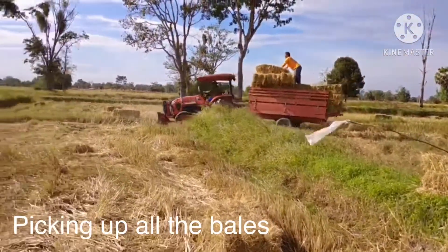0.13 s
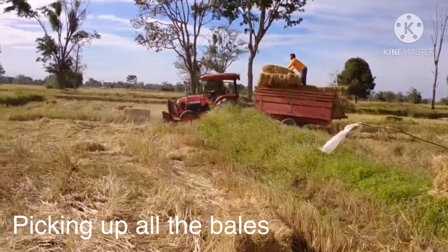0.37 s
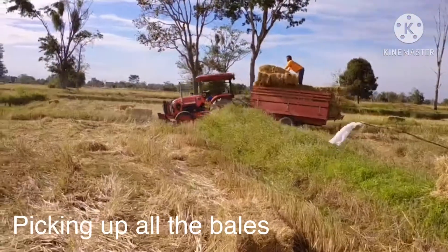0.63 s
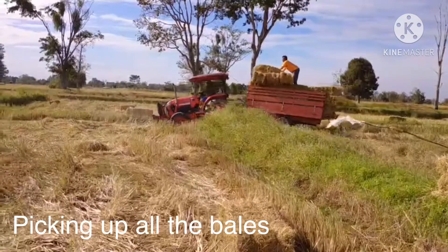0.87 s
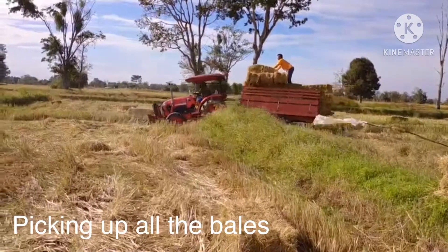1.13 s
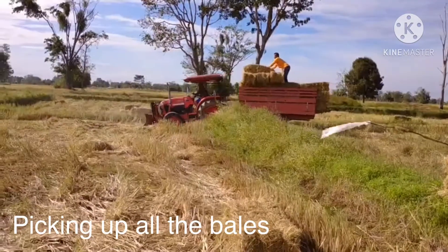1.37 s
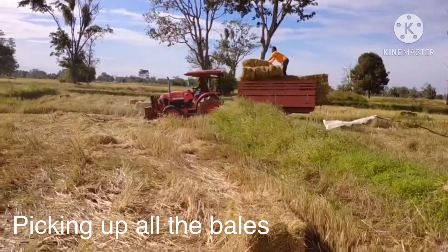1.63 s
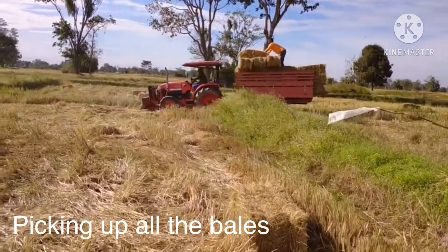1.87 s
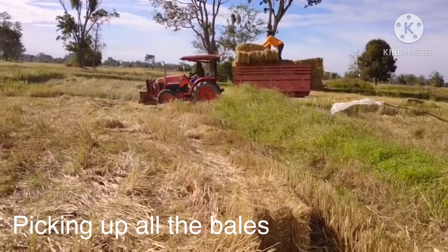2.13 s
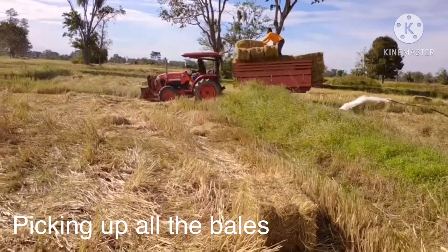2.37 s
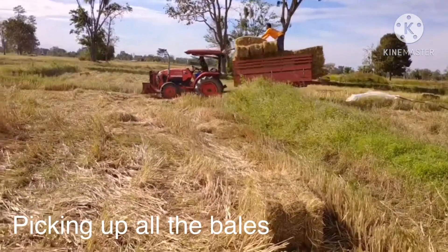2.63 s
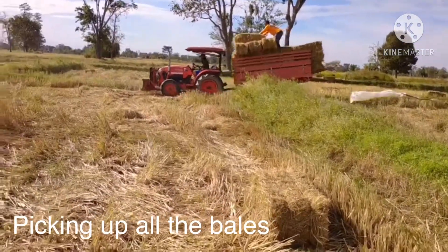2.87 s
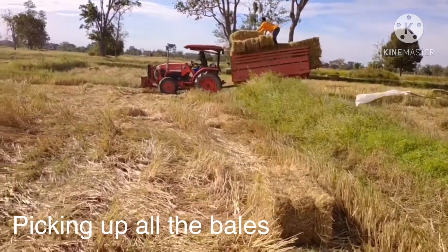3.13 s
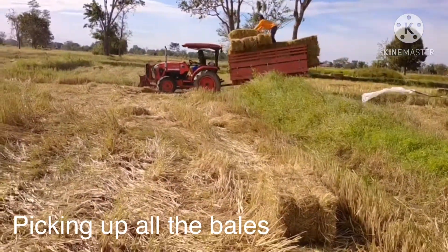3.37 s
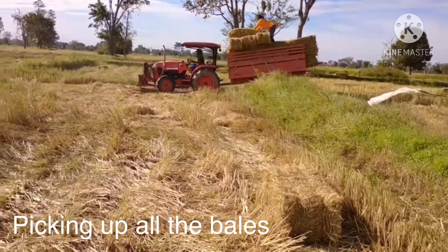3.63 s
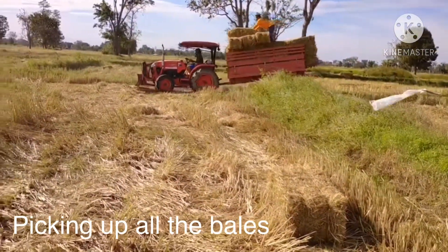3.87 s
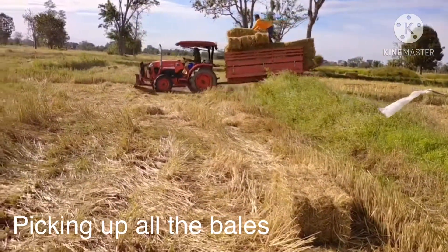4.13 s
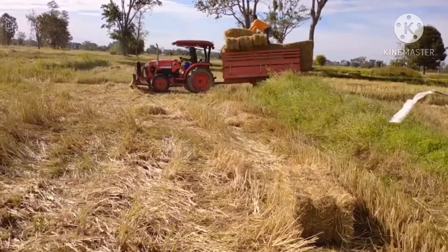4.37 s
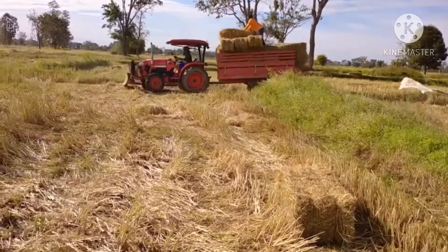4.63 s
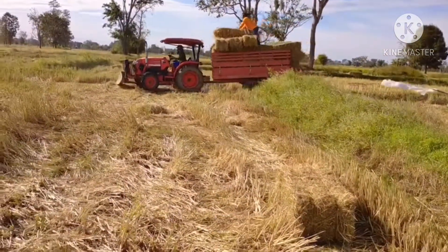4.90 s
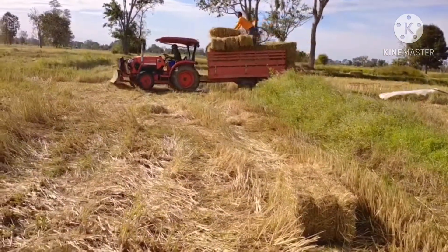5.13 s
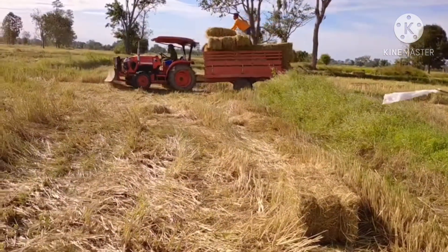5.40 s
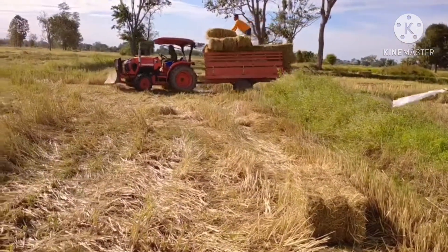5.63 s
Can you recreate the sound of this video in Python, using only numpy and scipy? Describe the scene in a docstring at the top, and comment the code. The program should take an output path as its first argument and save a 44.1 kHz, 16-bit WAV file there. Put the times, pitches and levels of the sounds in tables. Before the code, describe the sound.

A small diesel tractor tows a loaded trailer across an open field, some way from a single microphone, with no echo. The engine runs throughout, about thirty to thirty-five rapid firings a second, wavering in speed and rising slightly toward the end: low exhaust thump, metallic mid-range knock, clatter, fan whirr and fine hiss. Hard knocks stand out from 0.1 to 0.7 seconds. Tiny high squeaks from the hitch appear near 0.25, 0.8 and 1.5 to 2.0. Wind slams the microphone with deep, blunt pops at 0.76 to 0.9, briefly at 1.75, then heavily from 2.1 to 2.6, covering the engine, and again around 3.2. A very faint cricket lies between 1.8 and 3.7. After about 4.3 the knock darkens while whirr and clatter come forward; a small wind tap falls at 4.3, faint straw brushes at 5.0 and 5.3, and a thin wavering hum from 4.8.

```python
"""Tractor and trailer crossing a field

A small diesel tractor tows a loaded trailer in the open, some way off from the microphone.
Each firing thumps the exhaust pipe and knocks the block, both as rung resonances; clatter, fan, hiss and
straw are coloured noise. The trailer squeaks and is brushed by straw, thin hums come and go,
a cricket chirps, and gusts buffet the microphone as lumpy low noise and decaying pops."""
import sys
import numpy as np
from scipy import signal
from scipy.fft import rfft, irfft
from scipy.io import wavfile
from scipy.ndimage import uniform_filter1d

SR = 44100
rng = np.random.default_rng(int(sys.argv[2]) if len(sys.argv) > 2 else 0)


def master_out(mix):
    """Clip the mix to full scale and print it as 16-bit PCM to the path in sys.argv[1]."""
    frames = np.transpose(np.atleast_2d(mix))
    ceiling = np.clip(frames, -1, 1)
    pcm = np.round(ceiling * 32767).astype(np.int16)
    wavfile.write(sys.argv[1], SR, pcm)


def to_linear_factor(level_db):
    """Convert decibel levels (scalar or array-like) to linear amplitude factors."""
    exponent = np.asarray(level_db, float) / 20
    return 10 ** exponent


N = 254016

# engine speed: (time [s], rate [firings/s])
FIRING_RATE = [(0.0, 29.221), (0.72, 31.576), (0.96, 32.178), (1.2, 33.791), (1.44, 33.497), (2.16, 30.336),
               (2.4, 30.891), (3.6, 32.06), (4.08, 34.527), (4.32, 34.349), (4.8, 36.567), (5.04, 35.032),
               (5.76, 35.731)]
FIRST_FIRING = 0.86  # share of a firing interval already gone at the start
# the tractor on the field, before each layer takes its share:
# (time [s], level swing [dB], turned away [0-1], engine load [dB])
TRACTOR = [(0, -3.5, 0.48, 3), (.33, 2, 0.07, 0.5), (.67, -1, 0.3, 4), (.95, 1.5, 0.31, 1),
           (1.35, -1, 0.08, -2), (1.7, -1, 0.3, 2.8), (1.97, 4, .05, -0.8), (2.25, -0.5, 0.3, -1.5),
           (2.95, -1.5, 0, 1.5), (3.4, 1.5, 0, -1.1), (3.7, 0, 0, -1), (4.0, 3.5, 0.22, -3.5),
           (4.3, -0.5, 0.77, 1.5), (4.75, -2, 1, 1), (5.1, 3, 0.92, 0.7), (5.4, 1.1, 0.77, -1.5),
           (5.76, -2, .9, 1)]
# exhaust pipe resonances: (frequency [Hz], width of the first pass [Hz], relative level [dB])
PIPE_MODES = [(100.8, 47, 16), (120.4, 26, 8.5), (210, 12, -14)]
# modes of block and bonnet, before the tilt:
# (frequency [Hz], width of the first pass [Hz], relative level [dB], lag [firing intervals])
BLOCK_MODES = [(1103, 55, -7.5, .12), (1424, 120, -4, 0), (1838, 116, -3.5, .13), (2040, 45, -3, .1),
               (2160, 130, 0.5, 0.0755), (2370, 110, 1, 0.012), (2490, 43, -5, 0), (2578, 55, -5.5, 0.019),
               (3484, 51, -16.5, 0)]
# mechanical clatter, spectrum: (frequency [Hz], relative density [dB])
CLATTER_SPECTRUM = [(88, -21.5), (150, -1), (418, -16.5), (680, -11), (901, -15.5), (1120, -12.5),
                    (1470, -8.5), (1670, -13), (2120, -8.5), (2480, -17.5), (3200, -35.5), (4160, -63),
                    (7040, -120)]
# fan and gears, spectrum: (frequency [Hz], relative density [dB])
WHIRR_SPECTRUM = [(1650, -30), (2800, 5), (3300, 5), (3580, 5.5), (4100, 4), (4870, -0.5), (5200, -10.5),
                  (6760, -44), (11400, -120)]
# intake and valves, spectrum: (frequency [Hz], relative density [dB])
HISS_SPECTRUM = [(4350, -34.5), (7400, -13.5), (7670, -18), (8310, -1.5), (8710, 0.5), (9430, -10.5),
                 (10300, -17.5), (11100, -21.5), (14300, -23)]
# straw under the wheels, spectrum: (frequency [Hz], relative density [dB])
STRAW_SPECTRUM = [(3060, -50), (5200, -13.5), (5470, -8.5), (5830, -3.5), (6610, -5.5), (6970, -5),
                  (7800, -1), (10100, -33), (17200, -120)]
# the hardest firings: (time [s], intended peak level [dB], frequency that rings most [Hz])
HARD_FIRINGS = [(0.1101, -34.5, 2180), (0.2124, -27.5, 2080), (0.3421, -30.5, 2490), (0.377, -29.5, 2370),
                (0.4434, -24, 2220), (0.4768, -24.5, 2410), (0.5097, -27.5, 2190), (0.6679, -25.5, 2190),
                (1.224, -31, 2270), (1.6721, -31, 2300), (1.9545, -28, 2250), (2.0862, -26.5, 2170),
                (2.6703, -29.5, 2390), (2.8636, -29, 2180), (2.9901, -31, 2440), (3.022, -33.5, 2460),
                (3.055, -33, 2470), (3.0864, -34.5, 2510), (3.2117, -27.5, 2230), (3.3069, -32, 2170),
                (3.4291, -31.5, 2510), (3.5573, -29.5, 2520), (3.5897, -31.5, 2300), (3.712, -33.5, 2160)]
KNOCK_CREST_DB = 7.5  # taken off an intended peak to get the force of a firing
# knock slope about 2.3 kHz: (side on [dB/octave], change once turned [dB/octave])
KNOCK_SLOPE = (1.7, -6.5)
# how each layer follows the tractor: (level [dB], share of the swing [1], change once turned [dB])
EXHAUST_FOLLOWS = (-38, 0.5, -5)
KNOCK_FOLLOWS = (-44, .6, -2.5)
CLATTER_FOLLOWS = (-45, .6, 3.3)
WHIRR_FOLLOWS = (-59, .9, 5.3)
HISS_FOLLOWS = (-63.5, 1.1, 3.3)
STRAW_FOLLOWS = (-70.5, .9, 5.8)
EXHAUST_LOAD, KNOCK_LOAD = 1.1, 0.98  # share of the load heard in thump and knock
# squeaks of hitch and trailer, before roughness:
# (start [s], length [s], frequency [Hz], level [dB], second harmonic level [dB])
TRAILER_SQUEAKS = [(0.237, 0.029, 4000, -46, -77), (0.242, 0.05, 4200, -55, -76),
                   (0.762, 0.051, 4110, -53.5, -62), (1.493, 0.076, 4140, -53.5, -61),
                   (1.583, 0.061, 4060, -59, -67), (1.706, 0.19, 4950, -59.5, -63.5),
                   (1.777, 0.068, 3870, -52, -81), (1.87, 0.128, 4000, -53.5, -68),
                   (1.87, 0.18, 4820, -63, -70), (3.868, 0.066, 4020, -53.5, -75)]
# straw brushing the trailer side: (start [s], length [s], level [dB])
STRAW_BRUSHES = [(4.95, 0.21, -56.5), (5.33, 0.18, -63.5)]
# modes the straw rings: (frequency [Hz], width of the first pass [Hz], relative level [dB])
PANEL_MODES = [(6040, 200, 0), (6530, 150, 3), (7700, 290, 4)]
# thin hums, before they waver: (start [s], length [s], frequency [Hz], level [dB])
THIN_HUMS = [(0.198, 0.1, 710, -56), (0.5, .25, 715, -54), (2.017, .045, 612, -44), (3.4, .22, 719, -53),
             (4.843, 0.99, 1197, -50)]
# one cricket, level at full strength: (start [s], length [s], frequency [Hz], level [dB])
CRICKET_SONG = (1.8, 1.95, 11680, -83)
# gusts at the diaphragm; brightness and depth are relative to the level:
# (time at full strength [s], hold [s], level [dB], brightness [dB], depth [dB])
WIND_GUSTS = [(0.036, 0.024, -42.5, -26, 11), (0.196, 0.033, -43, -3, 13.5), (0.463, 0.014, -37, -17, 6),
              (0.517, 0.039, -48.5, -19, 16), (.764, 0.077, -14.5, -13.5, -16),
              (.876, 0.0084, -19.5, -11.5, -11), (1.648, 0.083, -43, -9, 4), (1.744, 0.088, -22, -23, -8),
              (1.931, 0.015, -40, -17, 9.5), (2.127, 0.014, -19, -20.5, -17),
              (2.171, 0.014, -15.5, -16, -13), (2.191, 0.12, -13, -5, -6.5), (2.378, 0.081, -14.5, -9, -8),
              (2.469, 0.12, -15.5, -6.5, -14.5), (2.67, .09, -45.5, -14, 8), (2.765, 0.088, -30.5, -20, 3),
              (2.916, 0.052, -34.5, -10, -3), (2.988, 0.085, -43, -23, 7), (3.107, 0.016, -32.5, -23, 4.5),
              (3.167, 0.034, -19.5, -3, 1.5), (3.232, 0.018, -31.5, -20, 2.5), (3.282, 0.01, -35, -41, 6),
              (4.263, 0.0088, -27.5, -14.5, -10), (4.586, .04, -34.5, -15.5, 5.5),
              (4.678, 0.033, -38, -10.5, 6), (4.81, 0.024, -39.5, -29, 13)]
BREEZE_DB, RUMBLE_DB = -52.5, -45.5  # lowest levels, between gusts
GUST_RISE_DB_PER_S, GUST_FALL_DB_PER_S = 1306, 546
BRIGHT_FADE_DB_PER_S = 57.5  # the bright eddies tire during a gust
RUMBLE_LAG_S = 0.014  # the rumble comes late
# single eddies that pop the diaphragm, before decay: (time [s], level [dB], frequency [Hz])
EDDY_POPS = [(0.761, -34, 182), (0.877, -5.5, 222), (1.737, -14.5, 250), (1.759, -15, 171),
             (2.175, -25, 151), (2.198, -2, 285), (2.271, -3, 202), (2.312, -9.5, 358), (2.377, -16, 167),
             (2.419, -7.5, 191), (2.485, -8.5, 238), (3.165, -8.5, 230), (3.177, -8, 307),
             (3.813, -27.5, 156), (4.271, -28.5, 210)]


def rms_one(x):
    """Scaled to rms 1."""
    return x / np.sqrt(np.mean(x ** 2) + 1e-20)


def in_time(rows):
    """Each column of a table, joined by straight lines, one value a sample."""
    s, *columns = np.transpose(rows)
    return [np.interp(np.arange(N) / SR, s, c) for c in columns]


def drift(rate_hz):
    """Slow chance: noise through a double one-pole low-pass, made every 40 samples; spread 1."""
    r = np.exp(-80 * np.pi * rate_hz / SR)
    white = rng.standard_normal(N // 40 + 2002)
    slow = signal.lfilter([1], [1, -2 * r, r * r], white)[2000:]
    return np.interp(np.arange(N) / 40, np.arange(len(slow)), rms_one(slow))


def resonance(x, hz, width_hz):
    """Two-pole resonance with gain 1 on top."""
    r = np.exp(-np.pi * width_hz / SR)
    poles = [1, -2 * r * np.cos(2 * np.pi * hz / SR), r * r]
    return signal.lfilter([(1 - r * r) / 2, 0, (r * r - 1) / 2], poles, x + 1e-18)


def ring(x, hz, first_hz, second_hz):
    """Two resonances in a row at one frequency, with the two given widths."""
    return resonance(resonance(x, hz, first_hz), hz, second_hz)


def cut(x, hz, kind, order):
    """Butterworth filter."""
    return signal.sosfilt(signal.butter(order, hz, kind, fs=SR, output="sos"), x)


def coloured(spectrum, patchy_db):
    """Noise of a given spectrum whose half-octave bands flicker partly together; rms 1."""
    hz = np.fft.rfftfreq(N, 1 / SR)[1:]
    point_hz, point_db = np.transpose(spectrum)
    shaped = rfft(rng.standard_normal(N))
    shaped[1:] *= to_linear_factor(np.interp(np.log(hz), np.log(point_hz), point_db))
    octave = np.log2(np.r_[1, hz])
    together, out = drift(4.7), 0
    for centre in np.arange(np.log2(point_hz[0]), np.log2(point_hz[-1]) + 0.5, 0.5):
        share = np.clip(1 - np.abs(octave - centre) * 2, 0, 1) ** 0.5
        flicker = to_linear_factor(patchy_db * (0.94 * together + drift(23.4)))
        out = out + irfft(shaped * share, N) * flicker
    return rms_one(out)


def swell(start, length):
    """A smooth rise and fall, with its sample span."""
    span = slice(round(start * SR), min(N, round((start + length) * SR)))
    return span, signal.windows.tukey(span.stop - span.start, 0.5)


def burst(count, lag, decay):
    """Pressure after each firing with a longer tail, timed in firing intervals, and the firing's number."""
    which, phase = np.divmod(np.maximum(count - lag, 0), 1)
    fall = np.exp(-phase / decay) + 0.38 * np.exp(-phase / 0.35)
    return fall * (1 - np.exp(-phase / 0.01)), which.astype(int)


def firing_force(firing, knock_db):
    """Gain of each firing, by chance or set for the hard ones, and the pitch a hard one favours (else 0)."""
    force = to_linear_factor(1.2 * rng.standard_normal(firing[-1] + 1))
    centre_hz = np.zeros(len(force))
    for s, db, hz in HARD_FIRINGS:
        at = round((s + 0.004) * SR)
        force[firing[at]] = to_linear_factor(db - knock_db[at] - KNOCK_CREST_DB)
        centre_hz[firing[at]] = hz
    return force, centre_hz


def exhaust_thump(count, firing):
    """The blow-down of each firing, a little after the knock and nearly alike, rings the pipe."""
    step = np.floor(count - 0.16)
    strength = to_linear_factor(1.8 * rng.standard_normal(firing[-1] + 1))
    puffs = np.diff(step, prepend=step[0]) * strength[firing]
    return sum(to_linear_factor(db) * ring(puffs, hz, width, 0.76 * width) for hz, width, db in PIPE_MODES)


def combustion_knock(count, force, centre_hz, turned):
    """Rough pressure of each firing rings block and bonnet; the knock darkens as the tractor turns."""
    knock, tilt_db = 0, KNOCK_SLOPE[0] + KNOCK_SLOPE[1] * turned
    for hz, width, db, lag in BLOCK_MODES:
        shape, which = burst(count, lag, 0.1)
        # a hard knock favours the modes near its pitch, the others share out by chance
        favoured_db = 4.0 - 11.3 * np.tanh(np.abs(centre_hz - hz) / 200)
        share_db = np.where(centre_hz > 0, favoured_db, 1.8 * rng.standard_normal(len(force)))
        pressure = shape * (force * to_linear_factor(share_db))[which] + 0.071
        rung = ring(rng.standard_normal(N) * pressure, hz, width, 3.3 * width)
        knock = knock + to_linear_factor(db + tilt_db * np.log2(hz / 2300)) * rms_one(rung)
    return knock


def clatter_and_whirr(count, force):
    """Mechanical clatter, and the whirr of fan and gears: steady noise swelling with each firing."""
    shape, which = burst(count, 0.1, 0.077)
    clatter = coloured(CLATTER_SPECTRUM, patchy_db=1.35) * (1 + 0.5 * shape * force[which])
    whirr = coloured(WHIRR_SPECTRUM, patchy_db=2.0) * (1 + 0.23 * shape * force[which])
    return clatter, whirr


def valve_hiss(count, firing):
    """Intake hiss, with a tick about 8.4 kHz as a valve seats after each firing."""
    shape, which = burst(count, 0.16, 0.053)
    strength = to_linear_factor(3.9 * np.tanh(rng.standard_normal(firing[-1] + 1)))
    hiss = coloured(HISS_SPECTRUM, patchy_db=1.0)
    return hiss + 2.35 * resonance(hiss * shape * strength[which], 8400, 1300)


def tractor():
    """One count of firings drives thump, knock, clatter, whirr and valve tick; straw runs on beside them."""
    swing_db, turned, load_db = in_time(TRACTOR)

    def follow(law):
        """Level of a layer in dB, following swing and turn."""
        db, share, turn_db = law
        return db + share * swing_db + turn_db * turned

    count = np.cumsum(in_time(FIRING_RATE)[0]) / SR + FIRST_FIRING
    firing = count.astype(int)
    exhaust_db = follow(EXHAUST_FOLLOWS) + EXHAUST_LOAD * load_db
    knock_db = follow(KNOCK_FOLLOWS) + KNOCK_LOAD * load_db
    force, centre_hz = firing_force(firing, knock_db)
    clatter, whirr = clatter_and_whirr(count, force)
    layers = [(exhaust_db, exhaust_thump(count, firing)),
              (knock_db, combustion_knock(count, force, centre_hz, turned)),
              (follow(CLATTER_FOLLOWS), clatter),
              (follow(WHIRR_FOLLOWS), whirr),
              (follow(HISS_FOLLOWS), valve_hiss(count, firing)),
              (follow(STRAW_FOLLOWS), coloured(STRAW_SPECTRUM, patchy_db=1.5))]
    return sum(to_linear_factor(db) * rms_one(layer) for db, layer in layers)


def wavering_time():
    """Seconds that run slightly unevenly, so that a tone wavers in pitch."""
    return np.cumsum(1 + 0.006 * drift(60)) / SR


def squeaks():
    """Hitch and trailer: rough tones with a second harmonic and a breath of friction noise on each."""
    out, clock = np.zeros(N), wavering_time()
    rough, white = to_linear_factor(5.0 * drift(45)), rng.standard_normal(N)
    for start, length, hz, first_db, second_db in TRAILER_SQUEAKS:
        span, shape = swell(start, length)
        squeak = 0
        for k, db in ((1, first_db), (2, second_db)):
            tone = to_linear_factor(db) * np.sin(2 * np.pi * k * hz * clock[span])
            friction = rms_one(ring(white[span], k * hz, k * 300, k * 600))
            squeak = squeak + rough[span] * tone + to_linear_factor(db - 6) * friction
        out[span] += shape * squeak
    return out


def straw_swish():
    """Noise of uneven strength, as dense grains of straw, rings a few high panel modes."""
    grains = rng.standard_normal(N) * to_linear_factor(3.3 * drift(40))
    modes = [to_linear_factor(db) * rms_one(ring(grains, hz, width, 2 * width)) for hz, width, db in PANEL_MODES]
    rung = rms_one(sum(modes))
    out = np.zeros(N)
    for start, length, db in STRAW_BRUSHES:
        span, shape = swell(start, length)
        out[span] += shape * to_linear_factor(db) * rung[span]
    return out


def hums():
    """Thin sines, wavering in pitch and strength, each over a narrow band of noise."""
    out, clock = np.zeros(N), wavering_time()
    uneven, white = to_linear_factor(5.6 * drift(32)), rng.standard_normal(N)
    for start, length, hz, db in THIN_HUMS:
        span, shape = swell(start, length)
        tone = uneven[span] * np.sin(2 * np.pi * hz * clock[span])
        band = rms_one(ring(white[span], hz, 50, 90))
        out[span] += shape * to_linear_factor(db) * (tone + 0.28 * band)
    return out


def cricket():
    """A very narrow band of noise, opened and closed by slow chance, chirps."""
    out = np.zeros(N)
    start, length, hz, db = CRICKET_SONG
    span, shape = swell(start, length)
    chirps = np.clip(0.3 + 0.5 * drift(15)[span], 0, 1)
    band = rms_one(ring(rng.standard_normal(N)[span], hz, 60, 120))
    out[span] = shape * chirps * to_linear_factor(db) * band
    return out


def gust_levels():
    """Gains of body, bright eddies and rumble: a gust arrives fast, holds and dies more slowly."""
    clock = np.arange(N) / SR
    level, bright, deep = np.full(N, to_linear_factor(BREEZE_DB)), np.zeros(N), np.full(N, to_linear_factor(RUMBLE_DB))
    for s, hold, db, bright_db, deep_db in WIND_GUSTS:
        rise_db = GUST_RISE_DB_PER_S * np.maximum(s - clock, 0)
        fall_db = GUST_FALL_DB_PER_S * np.maximum(clock - s - hold, 0)
        gust = to_linear_factor(db - rise_db - fall_db)
        tired_db = BRIGHT_FADE_DB_PER_S * np.maximum(clock - s, 0)
        late = np.roll(gust, round(RUMBLE_LAG_S * SR))
        level = np.maximum(level, gust)
        bright = np.maximum(bright, gust * to_linear_factor(bright_db - tired_db))
        deep = np.maximum(deep, late * to_linear_factor(deep_db))
    return level, bright, deep


def band_noise(low_pass, high_pass):
    """White noise between two Butterworth filters, each given as (frequency [Hz], order)."""
    low = cut(rng.standard_normal(N), low_pass[0], "low", low_pass[1])
    return cut(low, high_pass[0], "high", high_pass[1])


def pops():
    """Each eddy pushes or pulls the diaphragm into one quickly decaying sine."""
    out, t = np.zeros(N), np.arange(1200) / SR
    for (s, db, hz), sign in zip(EDDY_POPS, rng.choice([-1, 1], len(EDDY_POPS))):
        pop = np.sin(2 * np.pi * hz * t) * np.exp(-t * hz / 1.25)
        out[round(s * SR):][:len(t)] += sign * to_linear_factor(db) * pop
    return out


def wind():
    """Eddies push the diaphragm: lumpy low noise, brighter eddies in step with it, pops and late rumble."""
    level, bright, deep = gust_levels()
    lumps = to_linear_factor(2.26 * drift(55))
    # dividing by local power fills the gaps: a gust pushes without them
    low = band_noise((187.4, 3), (113.4, 4))
    low = rms_one(low / uniform_filter1d(low ** 2, size=900) ** 0.29 * lumps)
    high = band_noise((635, 4), (400, 2))
    high = rms_one(high / uniform_filter1d(high ** 2, size=600) ** 0.67 * lumps ** 2.3)
    eddies = uniform_filter1d(level, size=150) * low + uniform_filter1d(bright, size=150) * high
    rumble = uniform_filter1d(deep, size=400) * rms_one(band_noise((104, 3), (100, 2)))
    return cut(cut(eddies + pops(), 1500, "low", order=3), 83, "high", order=4) + rumble


def scene():
    """Tractor and trailer in the open, wind at the microphone; one channel."""
    return (tractor() + squeaks() + straw_swish() + hums() + cricket() + wind())[None]


def roll_off(x):
    """The treble ends steeply here."""
    return signal.sosfilt(signal.butter(12, 14490, fs=SR, output="sos"), x)


def record(dry):
    """The microphone drops the deep bass; a low-pass at 14.3 kHz then closes the top."""
    without_bass = cut(dry, 86, "high", order=3)
    mix = cut(without_bass, 14300, "low", order=12)
    return roll_off(mix)


dry = scene()
out = record(dry)
master_out(out)
```